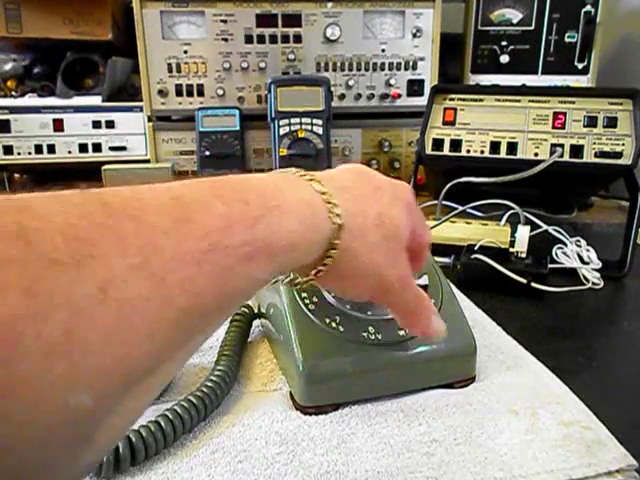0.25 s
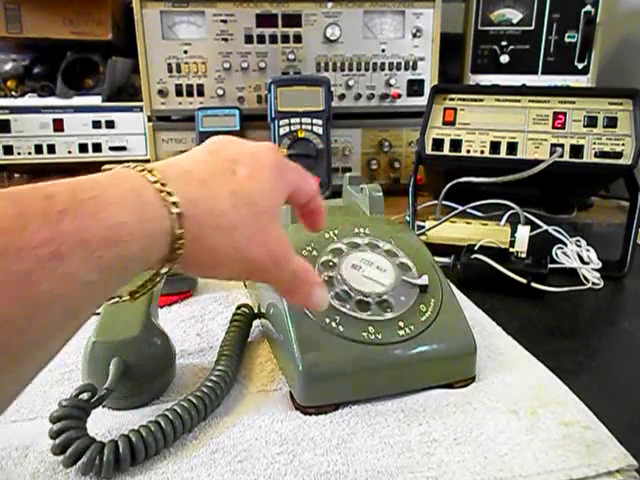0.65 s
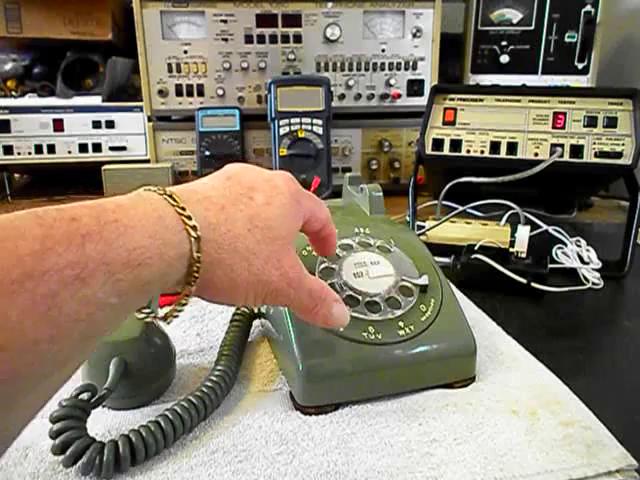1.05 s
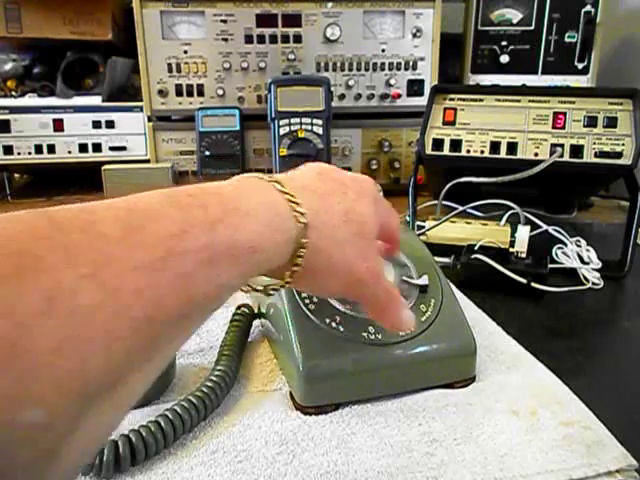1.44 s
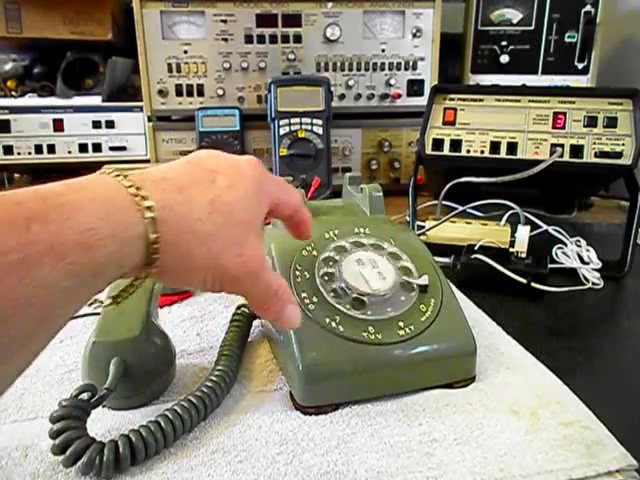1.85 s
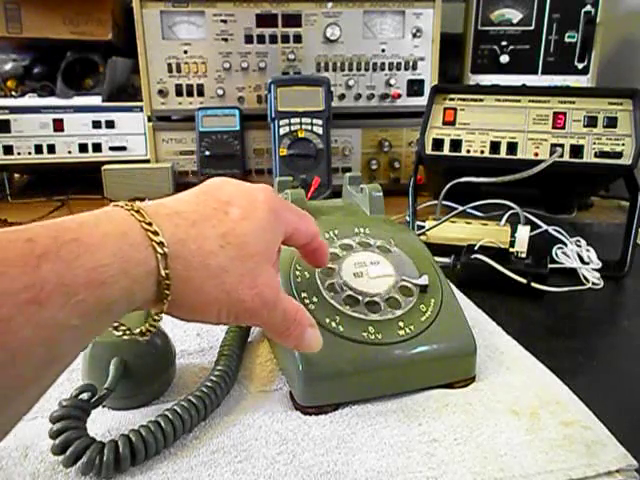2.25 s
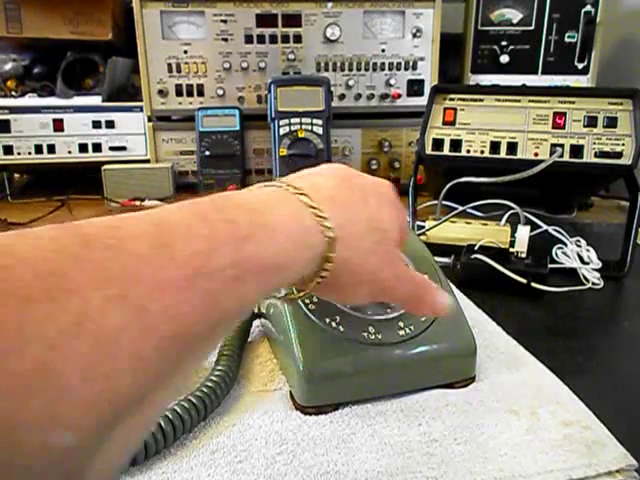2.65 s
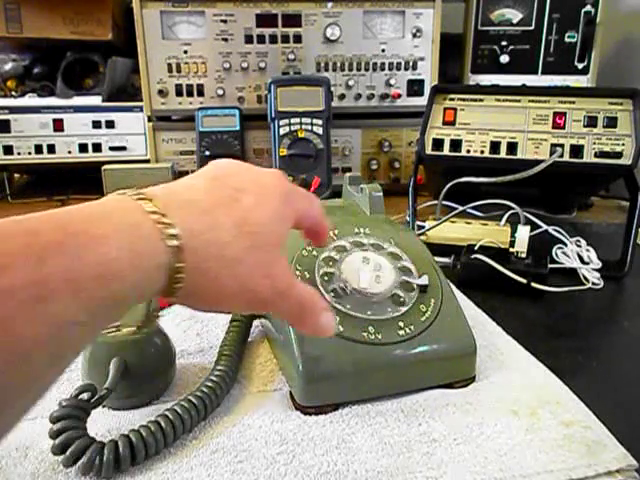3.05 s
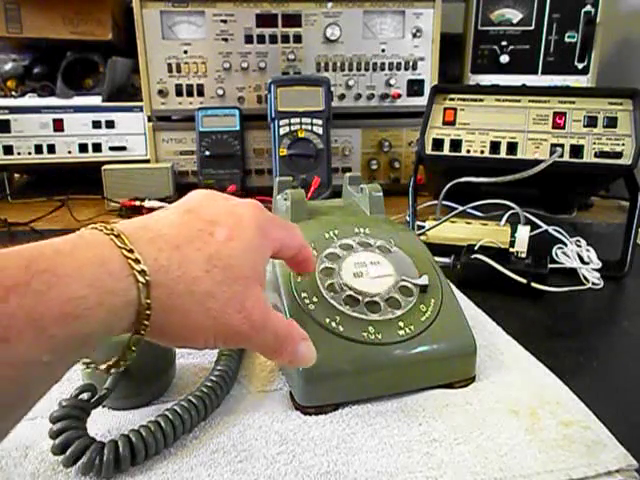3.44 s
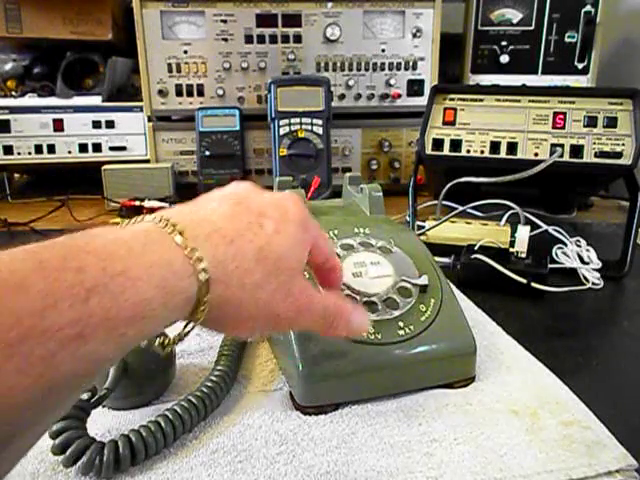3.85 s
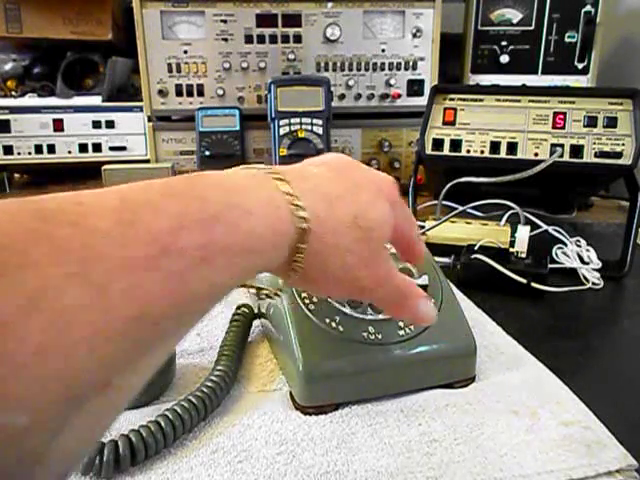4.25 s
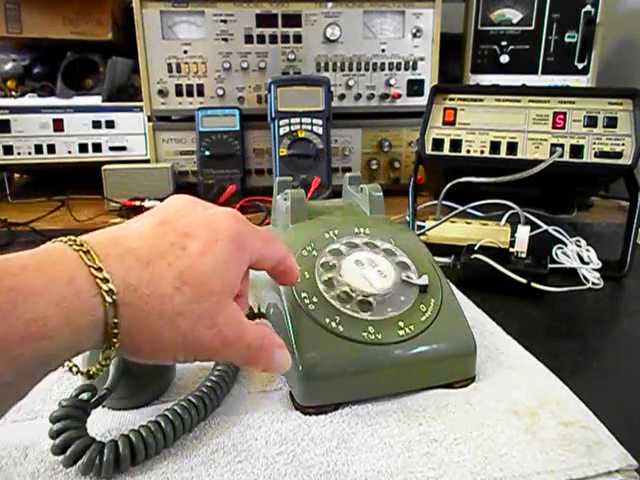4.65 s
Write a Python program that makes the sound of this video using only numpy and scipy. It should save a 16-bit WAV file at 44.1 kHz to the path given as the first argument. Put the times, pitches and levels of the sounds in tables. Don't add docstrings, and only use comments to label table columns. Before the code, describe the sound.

A rotary desk telephone is dialled four times, close to a small camera microphone in a little workshop where instrument fans hush very faintly. A fingertip taps the dial at the start, then drags it round with a quick gritty scrape from 0.1 s, hitting the finger stop with a double clack near 0.27 s. Let go at about 0.4 s, the dial spins up to a steady low buzz with a fine metallic rubbing and faint regular clicks, sagging slightly before a loud, sharp clack at 0.79 s and a short shivering rattle. The pattern repeats: scrape at 1.35-1.5 s, whirr from 1.65 s, clack at 2.1 s; scrape at 2.5-2.7 s, whirr from 2.85 s, clack at 3.4 s; scrape at 3.85-4.1 s with the hardest finger-stop hit, whirr from 4.25 s, final clack at 4.87 s. Small finger and nail ticks fill the gaps; the room echo is short.

```python
import sys
import numpy as np
from scipy import signal
from scipy.fft import rfft, irfft, next_fast_len
from scipy.io import wavfile
from scipy.ndimage import map_coordinates

SR = 44100
rng = np.random.default_rng(int(sys.argv[2]) if len(sys.argv) > 2 else 0)


def amplitude_ratio(level_db):
    exponent = np.asarray(level_db, float) / 20
    return 10 ** exponent


def unload_audio(sound):
    columns = np.transpose(np.atleast_2d(sound))
    steps = np.round(np.clip(columns, -1, 1) * 32767)
    wavfile.write(sys.argv[1], SR, steps.astype(np.int16))


N = 216451

# time in seconds, effort in dB, tone of the meshing teeth in Hz,
# weight of the finger on the case in dB.
PULLS = [
    [(0.09, -65.5, 1020, 13), (0.114, -39.5, 958, -12), (0.176, -32, 930, 4.5), (0.19, -26.5, 910, -1),
     (0.204, -34, 928, 1), (0.212, -27, 918, -4.5), (0.222, -31.5, 918, 2), (0.268, -27, 954, -1)],
    [(1.335, -69, 931, 17), (1.355, -44, 920, -3), (1.397, -33.5, 936, 4), (1.409, -27, 967.6, -0.5),
     (1.441, -23.5, 969, -7.5), (1.473, -26.5, 949, 5), (1.5, -26, 923.5, 5.5)],
    [(2.465, -60, 927.4, 2), (2.487, -38.5, 926.6, -4), (2.521, -34.5, 920, 5), (2.567, -30, 929, -2),
     (2.593, -24.5, 1013, -5.5), (2.615, -26, 1030, 1.5), (2.647, -31.5, 935.5, 5.5),
     (2.712, -26, 977, 1.5)],
    [(3.845, -64.5, 947, 8), (3.861, -44.5, 955, -3), (3.881, -29.5, 948, -1), (3.899, -26, 929, 1.5),
     (3.931, -37.5, 917, 4), (3.957, -26, 975, -1.5), (4.019, -30, 959, 3), (4.102, -23.5, 933, 0)],
]
# multiple of a quarter of the tone, level in dB.
MESH_PARTIALS = [(2, 2.5), (3, -5), (4, -1.5)]
# time in seconds, peak in dB, case thud in dB against the peak,
# rattle length in seconds, base thud in dB against the peak.
FINGER_STOPS = [
    (0.2727, -22, -4.5, 0.0062, -44),
    (0.2764, -14, -8.5, 0.0064, -36),
    (0.29, -20.5, -22, 0.0025, -24.5),
    (1.503, -17.5, -7, 0.0052, -37.5),
    (1.5113, -15.5, -7.5, 0.0047, -43),
    (2.7154, -14.5, -4.5, 0.011, -61),
    (2.7191, -17.5, -3, 0.0066, -36),
    (4.107, -11, -8, 0.0069, -50),
    (4.1109, -12, -19.5, 0.0063, -21.5),
]
REST_STOPS = [
    (0.7903, -6.5, -15, 0.0062, -41),
    (2.1007, -5, -12.5, 0.006, -41),
    (3.3912, -5, -16, 0.0067, -39.5),
    (4.871, -6, -15, 0.0055, -37),
]
# time in seconds, shell
# tap in dB, metal tick in dB against it, case thud in dB against it.
TOUCHES = [(0.0201, -23, -11, -15.5), (0.0673, -38.5, -18, 2), (0.1529, -34, 3, 6.5),
           (0.3832, -28.5, 2.5, -4), (1.0763, -44, -2, -14), (1.2012, -52.5, 3, 11),
           (1.2584, -45, -10, -20), (1.3077, -26.5, -26, -6), (1.6058, -34, 1, -5),
           (2.312, -50.5, -2.5, 12.5), (2.3527, -49.5, 9.5, 4), (2.378, -39, 7.5, -8),
           (2.431, -30.5, -15, -4.5), (2.4531, -53, 12.5, 11), (2.4867, -36, 4.5, -4),
           (2.6098, -28.5, 4.5, 6.5), (2.664, -29, 7.5, 0), (2.8153, -25, 1, -5.5),
           (3.5408, -30.5, -4.5, -6.5), (3.65, -49.5, 3, 4), (3.675, -43, 3.5, 1.5),
           (3.6894, -42.5, -7, -4.5), (3.7946, -31, -15, -5.5), (3.8167, -39, -9.5, -9.5),
           (3.8337, -40.5, 2, -19), (4.2274, -15, -5.5, -7.5)]
# time it runs free in seconds, spin-up in seconds, time of rest
# in seconds, steady tooth rate in Hz, whirr in dB.
SPRING_RETURNS = [
    (.404, 0.13, 0.78, 359.2, -32),
    (1.646, .095, 2.098, 362.8, -30.5),
    (2.84, .112, 3.388, 365.6, -30),
    (4.236, .12, 4.86, 370.8, -30.5),
]
# multiple of the governor shaft (4 is the tooth rate), level in dB.
SHAFT_ORDERS = [(4, 0), (5, -11), (6, -19), (7, -22), (8, -9), (10, -15), (12, -5), (16, -22)]
# last flick before rest in seconds, level in dB, spring tone in Hz, width in Hz.
CONTACT_SPRINGS = [
    (.024, -40.5, 2300, 70),
    (.078, -45, 1460, 70),
]

# frequency in Hz, width in Hz, level in dB.
CASE_MODES = [(368.2, 48, -0.5), (467, 31.3, 3), (541.4, 51.6, -2), (656, 62, -5.5), (919.4, 85, -1.5),
              (1106, 44, -1.5), (1234, 112, -10.5)]
# frequency in Hz, width in Hz, level in dB.
PLATE_MODES = [(1486, 110, -3.5), (1810, 134, 1.5), (2044, 540, -2.5), (2580, 470, -0.5), (3434, 210, -5.5)]
# frequency in Hz, width in Hz, level in dB.
BASE_MODES = [(160, 60, -12), (226, 13, 0)]
# frequency in Hz, width in Hz, level in dB.
CUP_MODES = [(4504, 267, 2.5), (4286, 500, -2.5), (5160, 860, -13.5), (5586, 815, -8.5), (6230, 910, -11),
             (7160, 336, -9.5)]
# frequency in Hz, width in Hz, level in dB.
STEEL_MODES = [(3010, 400, -8), (4413, 345, 6), (5300, 190, 0.5), (5640, 460, -4.5), (6510, 224, 0.5),
               (7060, 310, -3.5)]
# frequency in Hz, width in Hz, level in dB.
SHELL_MODES = [(1860, 330, 4), (2554, 180, 7.5), (3060, 720, -14.5)]

# frequency in Hz, level in dB per Hz.
GEAR_COLOUR = [(2180, -41), (3700, -15), (3840, -15), (4170, -4.5), (4510, 1.5), (5110, -7.5), (5610, -5.5),
               (6080, -10.5), (7130, -6), (7600, -17), (9880, -51), (16700, -120)]
# frequency in Hz, level in dB.
CASE_RADIATION = [(150, -34), (290, -16), (350, 0), (480, 1), (620, 4), (710, 0), (820, -3), (950, 5),
                  (1080, 0), (1250, -8), (1450, 0)]
# frequency in Hz, level in dB per Hz.
CHATTER_COLOUR = [(150, -31.5), (250, -9), (469, 0.5), (784, -12.5), (904, -8.5), (1330, -15.5), (1650, -7),
                  (1820, -13), (3830, -20), (6880, -10), (7600, -25.5), (9880, -39.5), (16700, -120)]
# frequency in Hz, level in dB per Hz.
FAN_COLOUR = [(15, -54.5), (25, -26.5), (91, -11), (133, -7.5), (226, -10.5), (662, -12), (765, -19),
              (904, -13.5), (971, -26.5), (1150, -20), (6740, -34.5), (7600, -40.5), (9880, -81),
              (16700, -120)]
# frequency in Hz, time to fall by 60 dB in seconds.
ROOM_DECAY = [(200, 0.59), (1000, 0.29), (3000, 0.42), (7000, 0.44)]
# frequency in Hz, level in dB.
MIC_RESPONSE = [(60, -7.5), (3600, 1), (3880, -3.5), (4050, 0), (7200, 0.5), (7600, -1), (7850, -18.5),
                (8000, -80.5)]
# frequency in Hz, level in dB.
MIRROR_RESPONSE = [(8000, -91.5), (8250, -28), (8500, -3), (8900, -21.5), (9200, -35.5), (9600, -65),
                   (15000, -70), (16000, -120)]


def unit(x):
    return x / np.sqrt(np.mean(x ** 2) + 1e-20)


def unit_gain(h):
    return h / np.sqrt(np.mean(np.abs(h) ** 2))


def along(points, hz):
    f, value = np.transpose(points)
    return np.interp(np.log(hz + 1), np.log(f + 1), value)


def filtered(x, response):
    size = next_fast_len(N + SR // 2)
    hz = np.fft.rfftfreq(size, 1 / SR)
    return irfft(rfft(x, size) * response(hz), size)[:N]


def coloured(x, curve):
    return filtered(x, lambda hz: amplitude_ratio(along(curve, hz)))


def ring(x, modes):
    def response(hz):
        total = 0
        for k, (centre, width, db) in enumerate(modes):
            damping = 1j * hz * width
            sign = (-1) ** k
            total = total + sign * amplitude_ratio(db) * damping / (centre ** 2 - hz ** 2 + damping)
        return unit_gain(total)
    return filtered(x, response)


def wobble(rate):
    knots = rng.standard_normal(int(N * rate / SR) + 4)
    return map_coordinates(knots, [np.arange(N) * rate / SR])


def grit(rate, spread_db):
    return unit(rng.standard_normal(N) * amplitude_ratio(spread_db * wobble(rate)))


def burst(s, length):
    u = (np.arange(N) / SR - s) / max(length, 1e-4)
    return rng.standard_normal(N) * (u > 0) * np.exp(-np.clip(u, 0, 9) ** 2)


def knock(s, width):
    u = (np.arange(N) / SR - s) / max(width, 1e-4)
    return np.sin(2 * np.pi * np.clip(u, 0, 1))


def fans():
    return amplitude_ratio(-50.5 + 1.2 * wobble(24)) * unit(coloured(rng.standard_normal(N), FAN_COLOUR))


def room(x):
    out, step = np.zeros(N + 2 * SR), SR // 4
    delay = 300
    for start in range(0, N, step):
        _, t, z = signal.stft(hz_noise := rng.standard_normal(SR // 2), SR, nperseg=256)
        hz = np.fft.rfftfreq(256, 1 / SR)
        fade = amplitude_ratio(-60 * t / along(ROOM_DECAY, hz)[:, None])
        tail = signal.istft(z * fade, SR, nperseg=256)[1]
        wet = signal.fftconvolve(x[start:start + step], tail / np.linalg.norm(tail))
        out[start + delay:][:len(wet)] += wet
    return out[:N]


def settling():
    t = np.arange(N) / SR
    fade = np.zeros(N)
    for s, db, *_ in REST_STOPS:
        fall_db = 60 * np.clip(t - s, 0, 2) / 0.31
        fade += (t > s + 0.004) * amplitude_ratio(db - 20 - fall_db)
    return fade * unit(coloured(grit(rate=150, spread_db=1), CHATTER_COLOUR))


def contacts():
    pulse_s = 0.088
    out = np.zeros(N)
    for before, db, spring_hz, width in CONTACT_SPRINGS:
        flicks = np.zeros(N)
        for (free, spin, *_), (rest, *_) in zip(SPRING_RETURNS, REST_STOPS):
            for k in range(8):
                s = rest - before - k * pulse_s
                if s > free + spin:
                    flicks += amplitude_ratio(db + rng.normal(0, 2)) * knock(s, 1 / spring_hz)
        out += ring(flicks, [(spring_hz, width, 0)])
    return out


def taps():
    low, upper, shell, metal = np.zeros((4, N))
    for s, db, tick, thud in TOUCHES:
        low += amplitude_ratio(db + thud - 7) * knock(s, 0.0024)
        upper += amplitude_ratio(db + 0.4 * thud - 5.5) * knock(s, 0.00066)
        shell += amplitude_ratio(db - 5.5) * (knock(s, 0.0003) + 0.72 * burst(s, 0.0067))
        metal += amplitude_ratio(db + tick - 7.5) * burst(s, 0.0055)
    case = ring(low, CASE_MODES[:4]) + ring(upper, CASE_MODES[4:])
    return case + ring(shell, SHELL_MODES) + ring(metal, STEEL_MODES)


def stops(events, plate_db, thud_db, late):
    metal, plate, thud, base = np.zeros((4, N))
    for s, db, case_rel, length, base_rel in events:
        metal += amplitude_ratio(db - 7.5) * burst(s, length)
        plate += amplitude_ratio(db + plate_db) * burst(s, length)
        push = 1.33 * knock(s + late, 0.00059) + 0.84 * burst(s + late, length)
        thud += amplitude_ratio(db + case_rel + thud_db) * push
        base += amplitude_ratio(db + base_rel - 1.5) * knock(s + late, 0.0028)
    dial = ring(metal, STEEL_MODES) + ring(plate, PLATE_MODES)
    return dial + ring(thud, CASE_MODES) + ring(base, BASE_MODES)


def strokes(tables, fade):
    t = np.arange(N) / SR
    s, *columns = np.transpose(np.concatenate(tables))
    gate = np.zeros(N)
    for rows in tables:
        inside = np.minimum(t - rows[0][0], rows[-1][0] - t)
        gate += np.clip(inside / fade + 1, 0, 1)
    return [np.interp(t, s, c) for c in columns] + [gate]


def winding():
    effort_db, mesh_hz, weight_db, gate = strokes(PULLS, fade=0.019)
    jerk = np.tanh(wobble(40) + 0.38 * wobble(120))
    turn = 2 * np.pi * np.cumsum(mesh_hz * (1 + 0.045 * wobble(90))) / SR / 4
    mesh = np.zeros(N)
    for k, db in MESH_PARTIALS:
        level_db = effort_db - 5.5 + db + 1.5 * k / 4 * weight_db + 4.5 * wobble(50)
        mesh += amplitude_ratio(level_db) * np.sin(k * turn)
    case = amplitude_ratio(effort_db + 3 + weight_db + 2.5 * jerk - 4.5) * grit(rate=120, spread_db=2)
    gear = amplitude_ratio(effort_db + 2.2 * jerk - 1.5) * grit(rate=300, spread_db=2.8)
    plate = amplitude_ratio(effort_db - 9.5 + 0.4 * weight_db + 1.8 * jerk + 2) * grit(rate=200, spread_db=1.5)
    scrape = filtered(gear, lambda hz: unit_gain(amplitude_ratio(along(GEAR_COLOUR, hz))))
    return gate * (mesh + ring(case, CASE_MODES) + ring(plate, PLATE_MODES) + scrape)


def governor():
    free_hz = 174
    sag_hz_per_s, tire_db_per_s = 27, 6.5
    creep_s, creep_db = 0.045, -4.5
    brake_s, brake_hz, brake_db = 0.032, 6.97, 0.5
    t = np.arange(N) / SR
    ends = [row[2] + 0.05 for row in SPRING_RETURNS]
    current = np.minimum(np.searchsorted(ends, t), len(SPRING_RETURNS) - 1)
    free, spin, rest, top_hz, db = np.transpose(SPRING_RETURNS)[:, current]

    started = (t - free) / spin
    held = np.clip(t - free - spin, 0, 1)
    brake = np.clip(1 + (t - rest) / brake_s, 0, 1)
    rise = np.sin(np.pi / 2 * np.clip(started, -0.1, 1))
    tooth_hz = free_hz + (top_hz - free_hz) * rise - sag_hz_per_s * held - brake_hz * brake
    creep = np.clip(1 - (t - free) / creep_s, 0, 2)
    whirr_db = db - tire_db_per_s * held + brake_db * brake + creep_db * creep
    rub_db = db - 6.5 - 0.4 * tire_db_per_s * held + 15.5 * np.log2(tooth_hz / top_hz)
    surge_db = 4 * np.sin(np.pi * np.clip(started, 0, 1))
    gate = np.clip(np.minimum((t - free) / creep_s + 1, (rest - t) / 0.002 + 2), 0, 1)
    return tooth_hz, whirr_db, surge_db, rub_db, gate


def returning():
    tooth_hz, whirr_db, surge_db, rub_db, gate = governor()
    shaft = 2 * np.pi * np.cumsum(tooth_hz * (1 + 0.0015 * wobble(30))) / SR / 4
    throb = np.cos(shaft / 4 + 0.6 * wobble(3)) + 0.6 * np.cos(shaft / 8 + 0.6 * wobble(3))
    waking_db = 4 * np.log2(tooth_hz / tooth_hz.max())
    hum = np.zeros(N)
    for k, db in SHAFT_ORDERS:
        loose = 0.25 if k % 4 == 0 else 1.1
        level_db = db + (k / 8) ** 2 * (throb + waking_db) + loose * 4.26 * wobble(35)
        phase = k * shaft + rng.uniform(0, 6.14) + loose * 0.62 * wobble(40)
        hum += amplitude_ratio(level_db) * np.sin(phase)
    hum = gate * amplitude_ratio(whirr_db + surge_db - 2.5 + 0.23 * throb) * unit(hum)
    case = gate * amplitude_ratio(whirr_db - 3.5) * grit(rate=80, spread_db=2.5)
    rub = gate * amplitude_ratio(rub_db + 0.97 * throb + 0.4 * np.cos(shaft))
    plate = rub * amplitude_ratio(-10.5) * grit(rate=300, spread_db=2.2)
    cup = rub * grit(rate=350, spread_db=2.3)
    rubbing = ring(case, CASE_MODES) + ring(plate, PLATE_MODES) + ring(cup, CUP_MODES)
    return coloured(hum, CASE_RADIATION) + rubbing


def scene():
    finger = stops(FINGER_STOPS, plate_db=-9, thud_db=7.5, late=0.00078)
    rest = stops(REST_STOPS, plate_db=-13, thud_db=2.5, late=0.002587)
    handled = winding() + finger + taps()
    sprung = returning() + rest
    echo = room(amplitude_ratio(-8) * handled + amplitude_ratio(-14) * sprung)
    return (fans() + echo + settling() + contacts() + handled + sprung)[None]


def band_limit(x):
    return signal.sosfilt(signal.butter(12, 9000, fs=SR, output="sos"), x)


def record(dry):
    camera_hz = 16000
    x = coloured(dry[0], MIC_RESPONSE)
    mirror = x * np.cos(2 * np.pi * camera_hz * np.arange(N) / SR)
    x = x + coloured(mirror, MIRROR_RESPONSE)
    return band_limit(x[None])


dry = scene()
out = record(dry)
unload_audio(out)
```